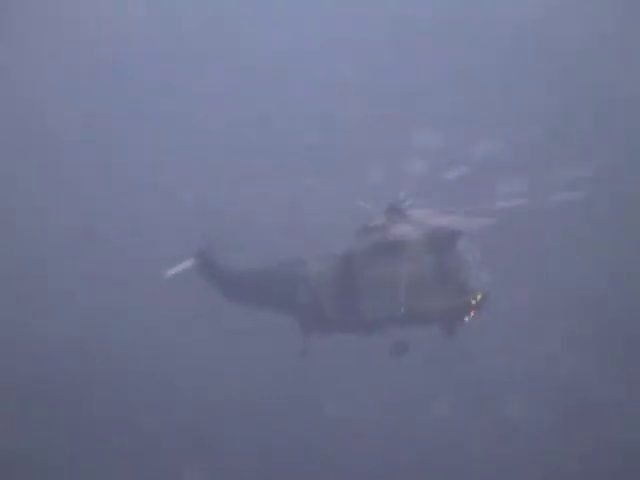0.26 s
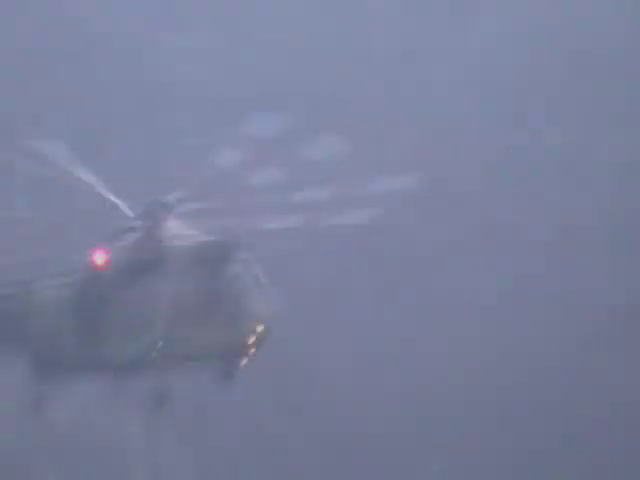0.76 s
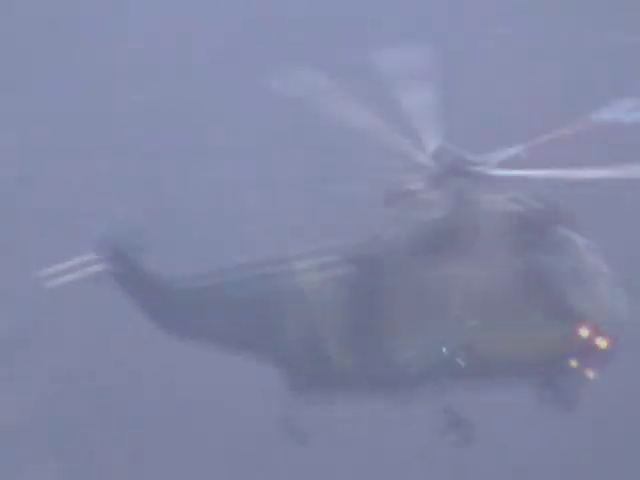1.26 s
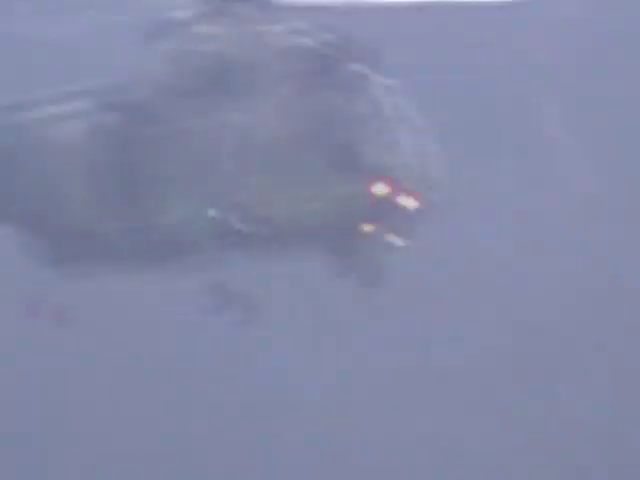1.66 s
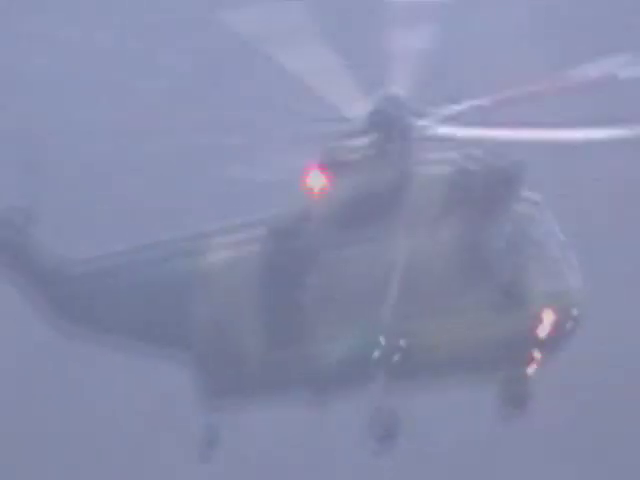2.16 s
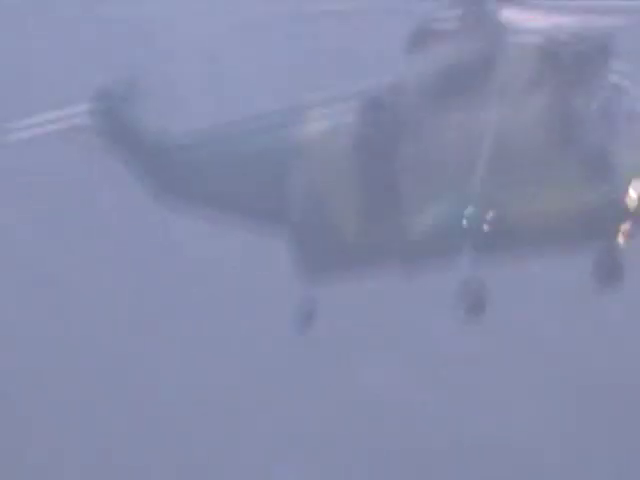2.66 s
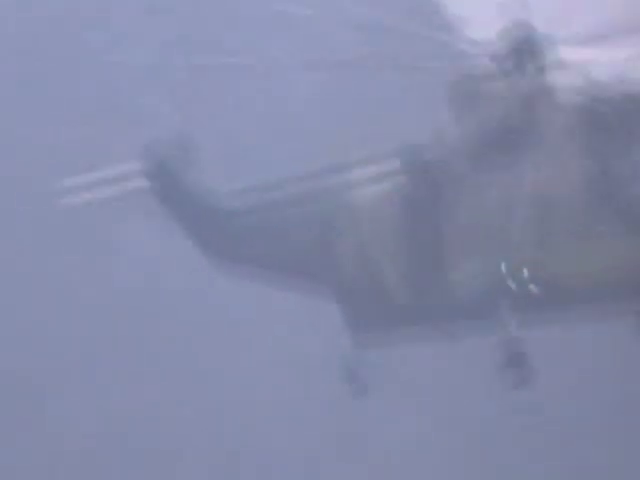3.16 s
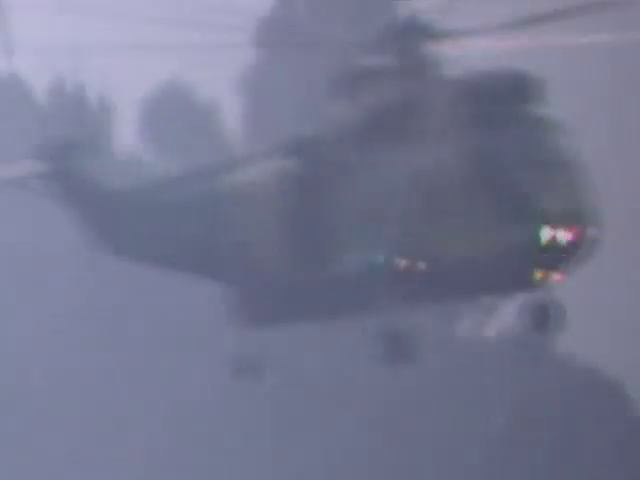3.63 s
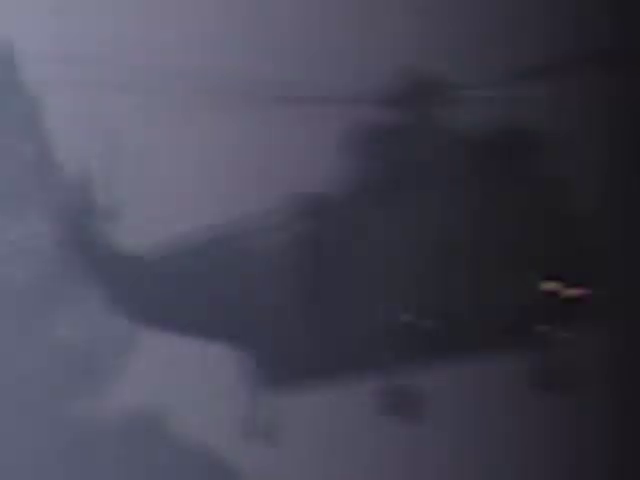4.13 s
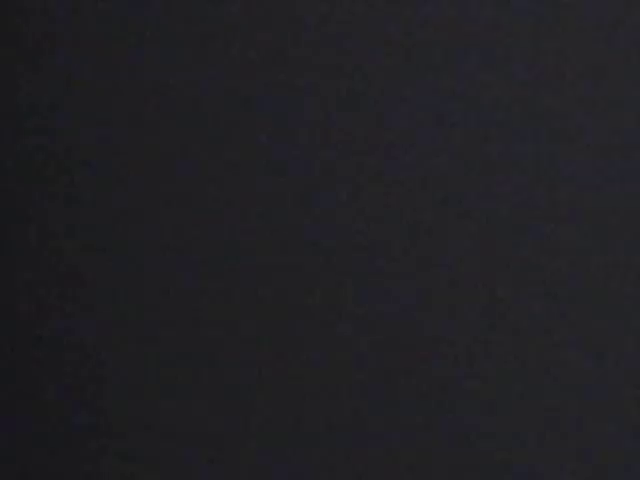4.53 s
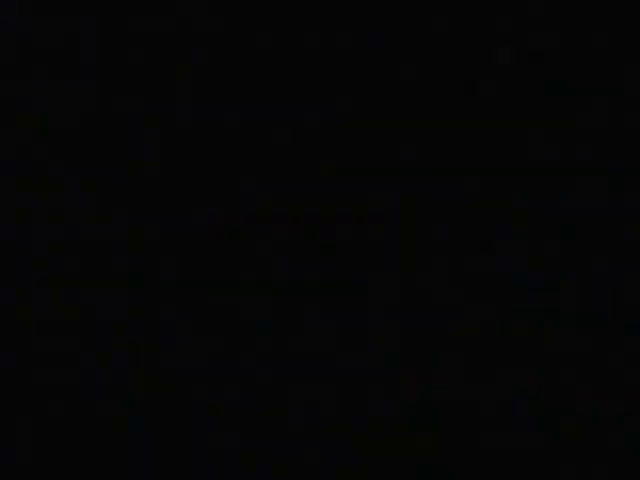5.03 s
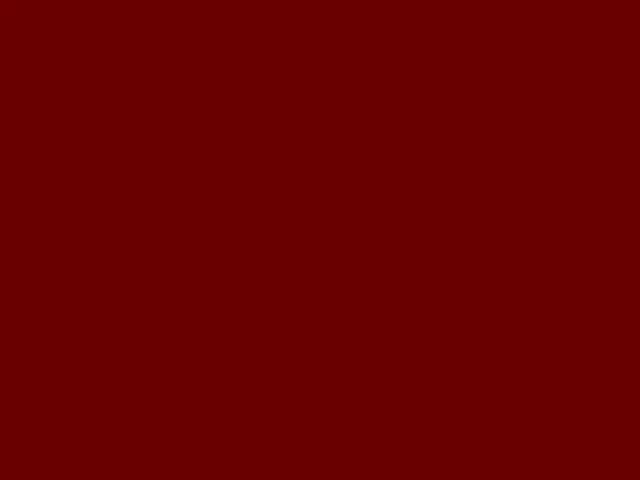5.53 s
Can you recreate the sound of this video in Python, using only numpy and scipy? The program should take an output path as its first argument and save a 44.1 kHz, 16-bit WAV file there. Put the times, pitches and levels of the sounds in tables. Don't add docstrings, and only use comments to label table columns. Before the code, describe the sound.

Outdoor helicopter flyby caught by a small stereo camera microphone. Fast, fluttering rotor pulses from several blade trains throb together, with midrange jet roar, faint gear whine and hiss cut into uneven ticks. Irregular cracking slaps come early, then again around the middle. One dry handling-like click is very close. From about three and a half seconds everything fades steadily, ending silent.

```python
import sys
import numpy as np
from scipy import signal
from scipy.fft import rfft, irfft, next_fast_len
from scipy.io import wavfile
from scipy.ndimage import uniform_filter1d

SR = 44100
rng = np.random.default_rng(int(sys.argv[2]) if len(sys.argv) > 2 else 0)


def waveform_to_disk(signal):
    frames = np.transpose(np.atleast_2d(signal))
    scaled = np.clip(frames, -1, 1) * 32767
    samples = np.round(scaled).astype(np.int16)
    wavfile.write(sys.argv[1], SR, samples)


def voltage_ratio(level):
    return 10 ** (np.asarray(level, float) / 20)


N = 255339
TIME = np.arange(N) / SR

# time_s, passes_hz
CHOP_RATE = [(0.0, 37.063), (0.45, 37.004), (0.9, 36.942), (1.35, 36.841), (1.8, 36.711), (2.25, 36.605),
             (2.7, 36.529), (3.15, 36.458), (3.6, 36.375), (4.05, 36.292), (4.5, 36.215), (4.95, 36.142),
             (5.4, 36.068)]
CHOP_START = .473
# start_s, peak_db, ring_hz
SLAP_EVENTS = [(0.615, -22.5, 1085), (0.6695, -17, 1266), (0.679, -20, 1320), (0.7279, -21, 1165),
               (0.747, -27.5, 1120), (0.818, -26.5, 1030), (0.84, -20.5, 1300), (0.856, -24.5, 1266),
               (0.911, -20, 1143), (0.964, -26, 1664), (1.836, -24.5, 910), (2.373, -33, 1137),
               (2.525, -28, 1310), (3.043, -34, 1163), (3.917, -25.5, 1280), (4.189, -28, 1180),
               (4.238, -33.5, 1180), (4.46, -35, 1180), (0.8938, -19.5, 1225), (0.9474, -19, 1200),
               (1.0198, -21.5, 1146), (1.136, -19.5, 1230), (1.281, -26.5, 1173), (1.3395, -19, 1110),
               (1.3897, -30, 1150), (1.4488, -19, 1240), (2.003, -26.5, 1216), (2.0622, -26, 1200),
               (2.3292, -25.5, 1280), (2.4977, -26.5, 1190), (2.992, -37.5, 1198), (3.1435, -32.5, 1230),
               (3.235, -22, 1180), (3.5917, -25.5, 1320), (3.694, -19, 1270), (3.7453, -22, 1260),
               (3.8063, -20, 1210), (3.9682, -20.5, 1140), (4.0235, -36, 1190), (.0992, -25, 1350),
               (.4274, -27.5, 1340), (.8764, -27, 1330), (1.1997, -26, 1210), (1.489, -27, 1250),
               (1.5628, -25, 1200), (2.2767, -30, 1280), (2.8325, -31, 1250), (3.3702, -37.5, 1320),
               (3.6471, -24, 1290), (4.1031, -29.5, 1290)]
# time_s, share_of_later_colour (0-1)
TURN_AWAY = [
    (0, 0.02),
    (.9, 0.12),
    (1.7, 0.6),
    (2.5, 0.82),
    (5.8, 0.99),
]
# pitch_hz, left_over_right_db, left_lead_rad, likeness (0-1)
MIC_PAIR = [(34.4, 6.8, -1.05, 0.97), (70, 1.5, -.87, 1), (130, -1, -0.55, 0.97), (300, -3.2, -0.2, 1),
            (1000, -2.2, .06, .98), (2480, -2.1, .08, .96), (4000, -4, 0, .97), (6300, -3.4, .07, .94),
            (7100, -1.5, .35, .7), (7900, 3.5, -2.2, .3), (8700, 2.2, -1.7, .8), (9600, 2, -1.2, .8),
            (10500, -1.5, -.9, .8), (12000, -.3, -.5, .15)]
BOUNCES = rng.uniform(.0003, .006, (2, 7))


def evened(x):
    return x / np.sqrt(np.mean(x ** 2) + 1e-20)


def read(points, hz, col=1):
    table = np.transpose(points)
    return np.interp(np.log(hz + 1), np.log(table[0] + 1), table[col])


def along(rows, col=1):
    table = np.transpose(rows)
    return np.interp(TIME, table[0], table[col])


def turned_away():
    return np.clip(along(TURN_AWAY), 0, 1)


def turns_of(rate, start):
    return np.cumsum(along(rate)) / SR + start


def wobble(hz):
    z = rfft(rng.standard_normal(N // 64 + 2))
    slow = irfft(z / (1 + (np.linspace(0, SR / 128, len(z)) / hz) ** 2))
    return np.interp(np.arange(N) / 64, np.arange(len(slow)), evened(slow - slow.mean()))


def ports(hz):
    # pitch_hz, level_db
    shell_echo = [(600, -14), (2000, -22), (5000, -22), (7000, -12), (8500, -5), (10000, -5), (14000, -5)]
    half = voltage_ratio(read(MIC_PAIR, hz) / 2) * np.exp(.5j * read(MIC_PAIR, hz, col=2))
    echoes = sum(np.exp(-2j * np.pi * np.outer(delay, hz)) for delay in BOUNCES.T)
    echoes = echoes / np.sqrt(BOUNCES.shape[1])
    share = voltage_ratio(read(shell_echo, hz))
    return np.array([half, 1 / half]) * (1 + share * echoes) / np.sqrt(1 + share ** 2)


def heard(x):
    size = next_fast_len(N + 4096)
    return irfft(rfft(x, size) * ports(np.fft.rfftfreq(size, 1 / SR)), size)[:, :N]


def noise(colour, patchy_db, size=1024, apart=0., bins=7, frames_long=12):
    hop = size // 4
    frames, hz = N // hop + 5, np.fft.rfftfreq(size, 1 / SR)
    a, b, c, d, patches = rng.standard_normal((frames, len(hz), 5)).T
    patches = uniform_filter1d(patches, size=round(bins), axis=0)
    patches = evened(uniform_filter1d(patches, size=round(frames_long), axis=1))
    same = np.clip(read(MIC_PAIR, hz, col=3) - apart, -1, 1)[:, None]
    left = a + 1j * b
    right = same * left + np.sqrt(1 - same ** 2) * (c + 1j * d)
    z = np.array([left, right]) * ports(hz)[:, :, None]
    z *= voltage_ratio(read(colour, hz)[:, None] + patchy_db * patches)
    return evened(signal.istft(z, nperseg=size, noverlap=size * 3 // 4)[1][:, :N])


def blades(orders, turns, unsteady_db, jitter, sweep=0.):
    k, db = np.transpose(orders)
    level = np.interp(np.arange(129), np.r_[0, k, k[-1] + 7], np.r_[-80, db, -80])
    log_gain = level * np.log(10) / 20
    phase = -signal.hilbert(np.r_[log_gain, log_gain[-2:0:-1]]).imag
    phase = phase - sweep * np.arange(256) ** 2
    turns = turns + jitter * wobble(5.4)
    wave = 0
    for m, order_db in orders:
        strength = voltage_ratio(order_db + unsteady_db * wobble(0.57))
        wave = wave + strength * np.cos(2 * np.pi * round(m) * turns + phase[round(m)])
    return np.sqrt(2) * wave * voltage_ratio(unsteady_db * wobble(32))


def rotors():
    # time_s, passes_hz
    loud_rate = [(0.0, 38.748), (0.45, 38.693), (0.9, 38.633), (1.35, 38.526), (1.8, 38.402),
                 (2.25, 38.306), (2.7, 38.233), (3.15, 38.152), (3.6, 38.062), (4.05, 37.973),
                 (4.5, 37.894), (4.95, 37.816), (5.4, 37.739)]
    slow_rate = [(0.0, 22.385), (0.45, 22.465), (0.9, 22.511), (1.35, 22.3), (1.8, 22.038), (2.25, 21.972),
                 (2.7, 22.034), (3.15, 22.073), (3.6, 22.078), (4.05, 22.014), (4.5, 21.983),
                 (4.95, 21.996), (5.4, 22.008)]
    # multiple, rms_db
    loud_orders = [(1, -48.5), (2, -55.5), (3, -37), (4, -51), (5, -49.5), (6, -45), (7, -41.5), (8, -36),
                   (9, -32.5), (10, -36), (11, -37.5), (12, -38.5), (13, -38.5), (14, -63.5), (15, -64),
                   (16, -54), (17, -55), (18, -60.5), (19, -62.5), (20, -69), (21, -86.5), (22, -65.5),
                   (23, -52.5), (24, -60), (25, -59.5), (26, -59)]
    chop_orders = [(1, -64), (2, -76.5), (3, -47), (4, -47.5), (5, -55), (6, -45.5), (7, -51.5), (8, -47.5),
                   (9, -40.5), (10, -43), (11, -44), (12, -44.5), (13, -48), (14, -50), (15, -52.5)]
    slow_orders = [(1, -69.5), (2, -57.5), (3, -42.5), (4, -36), (5, -42), (6, -38.5), (7, -37.5), (8, -60),
                   (9, -57.5), (10, -50.5), (11, -47.5), (12, -49), (13, -58)]
    loud = blades(loud_orders, turns_of(loud_rate, .255), unsteady_db=.5, jitter=.001, sweep=.028)
    chop = blades(chop_orders, turns_of(CHOP_RATE, CHOP_START), unsteady_db=.7, jitter=.002)
    slow = blades(slow_orders, turns_of(slow_rate, .732), unsteady_db=.6, jitter=.004)
    return voltage_ratio(-0.22) * heard(loud + chop + slow)


def slaps():
    thud_early, thud_late = .55, .12
    glide, glide_s = .13, .003
    out, t, late = np.zeros(N), np.arange(1300) / SR, turned_away()
    thud = -(np.sin(2 * np.pi * 800 * t) - .6 * np.sin(2 * np.pi * 1600 * t)) * voltage_ratio(-60 * t / 0.012)
    bent = t - glide * glide_s * (1 - np.exp(-t / glide_s))
    front = 1 - np.exp(-t / 0.00049)
    for s, db, hz in SLAP_EVENTS:
        share = thud_early + (thud_late - thud_early) * late[round((s - .3) * SR) if s > .3 else 0]
        ring = np.sin(2 * np.pi * 1.03 * hz * bent)
        ring += 0.2 * np.sin(2 * np.pi * 0.44 * hz * t) + 0.18 * np.sin(2 * np.pi * 1.38 * hz * t)
        slap = (share * thud + ring * voltage_ratio(-60 * t / 0.031)) * front
        out[round(s * SR):][:len(t)] += slap * voltage_ratio(db - 0.5)
    return heard(out)


def lulls():
    lull_s, lull_db = .009, -7
    half = lull_s / 2
    return lull_db * np.max([np.exp(-((TIME - s + half) / half) ** 2) for s, db, hz in SLAP_EVENTS], axis=0)


def roaring(facing_db, late):
    # pitch_hz, level_db
    side_colour = [(420, -41.5), (720, 4), (764, -1), (903, 5.5), (1000, -3.5), (1260, 7.5), (1440, -5),
                   (1600, 0), (1910, -9.5), (2150, -7), (2580, -14.5), (3000, -32.5), (3900, -51.5),
                   (6600, -120)]
    away_colour = [(420, -37.5), (720, -1.5), (893, -0.5), (1050, -0.5), (1250, 1.5), (1320, 2.5),
                   (1430, -6.5), (1690, 0.5), (1980, -9.5), (2130, -4), (2580, -25.5), (3000, -18),
                   (3900, -29), (6600, -120)]
    throb = np.cos(2 * np.pi * (18.2 * TIME + 0.68 + 0.095 * wobble(1.2))) ** 3
    side = noise(side_colour, patchy_db=0.77, bins=4, frames_long=14)
    away = noise(away_colour, patchy_db=0.77, bins=4, frames_long=14)
    roar = np.sqrt(1 - late) * side + np.sqrt(late) * away
    return roar * voltage_ratio(-33.5 + facing_db + 1.6 * throb + lulls() + 0.25 * wobble(40))


def droning(facing_db, late):
    # pitch_hz, level_db
    drone_colour = [(430, -25), (520, 9), (580, 8), (650, 7.5), (720, -13), (800, -49.5)]
    # centre_s, width_s, level_db
    surges = [
        (1.1, .1, 2.5),
        (3.3, .12, 4.5),
        (4.1, .5, 5.5),
    ]
    lead_s = 0.32 * (1 - late)
    led_db = np.interp(TIME + lead_s, TIME, facing_db)
    level_db = -37 + 2.1 * led_db + 1.0 * wobble(1.7)
    level_db = level_db + sum(db * np.exp(-((TIME - s) / width) ** 2) for s, width, db in surges)
    return voltage_ratio(level_db + .5 * lulls()) * noise(drone_colour, patchy_db=.8, bins=3, frames_long=20)


def rumbling(facing_db, late):
    # pitch_hz, level_db
    rumble_colour = [(30, -47), (60, -34.5), (100, -7.5), (125, 2), (150, -1.5), (185, 6), (210, -12),
                     (240, 0.5), (285, -10), (400, -11.5), (520, -11), (750, -17.5), (1100, -49.5)]
    level_db = -33.5 - 1 * (1 - late) - .2 * facing_db + .2 * wobble(4.4)
    return voltage_ratio(level_db) * noise(rumble_colour, patchy_db=.2, size=2048)


def rim():
    # pitch_hz, level_db
    rim_colour = [(1300, -27), (1650, 6.5), (1900, -4.5), (2200, -2.5), (2600, -8), (3100, -13),
                  (3800, -44)]
    sweep = np.exp(-((TIME - 1.45) / 0.27) ** 2)
    return voltage_ratio(-40) * sweep * noise(rim_colour, patchy_db=3.5, size=512)


def whining():
    # pitch_hz, rms_db
    whine_tones = [(1587, -57), (2101, -63), (3068, -66), (3569, -69), (3714, -67), (3890, -70),
                   (4134, -66), (4900, -68), (5206, -72), (5441, -72), (6035, -72), (6331, -71),
                   (7090, -75), (7295, -76), (8293, -79)]
    tones = 0
    for hz, db in whine_tones:
        level = voltage_ratio(db + 2.5 + 2.5 * wobble(5))
        tones = tones + level * np.cos(2 * np.pi * hz * TIME + .7 * wobble(4))
    return heard(tones)


def gear():
    # time_s, pitch_hz, rms_db
    gear_course = [(0, 930, -45), (.55, 927.5, -45), (.7, 927, -49), (1.1, 925, -47.5), (1.5, 922, -49),
                   (1.85, 918, -46.5), (2.3, 916, -52)]
    dying_db = 30 * np.maximum(TIME - 2.3, 0)
    level_db = along(gear_course, col=2) + 2 - dying_db + 2 * wobble(5)
    return heard(voltage_ratio(level_db) * np.cos(2 * np.pi * turns_of(gear_course, 0) + 0.08 * wobble(3)))


def turbine():
    # time_s, level_db
    facing = [(0, -3), (.3, -2.5), (.6, -1), (.95, 1), (1.2, -0.5), (1.55, -0.8), (1.9, -3), (2.3, -4.5),
              (2.7, -6), (3.15, -2.5), (3.35, -4), (3.65, -3.5), (4.1, -5), (4.8, -6.5), (5.3, -3.5)]
    facing_db, late = along(facing), turned_away()
    broad = roaring(facing_db, late) + droning(facing_db, late) + rumbling(facing_db, late)
    return broad + rim() + whining() + gear()


def knocks(turns, strength):
    # place_turns, level_db
    knock_places = [
        (0.099, 7),
        (.17, 4.5),
        (0.26, -2),
    ]
    # pitch_hz, level_db, t60_s
    metal_rings = [(8950, -9, .01), (9300, -7, .011), (9680, -4, .01), (9900, 0, .012), (10110, -1, .012)]
    t, train = np.arange(700) / SR, np.zeros(N)
    for turn, db in knock_places:
        train[1:] += voltage_ratio(db) * np.diff(np.floor(turns - turn)) * strength[1:]
    ring = sum(voltage_ratio(db - 60 * t / t60) * np.sin(2 * np.pi * hz * t) for hz, db, t60 in metal_rings)
    ring = ring * (1 - np.exp(-t / .0005))
    return evened(heard(signal.oaconvolve(train, ring)[:N]))


def exhaust():
    # pitch_hz, level_db
    hiss_colour = [(1290, -26.5), (2200, -0.5), (2830, -3), (3040, -3), (3230, -4), (4000, -4), (4500, -9),
                   (4980, -6), (5430, -8.5), (6820, -9), (8370, -11.5), (10000, -16), (11600, -48.5),
                   (14400, -47.5)]
    tick_colour = [(3000, -27), (4500, -11.5), (6500, -8), (8000, -17), (9500, -10), (10300, -21.5),
                   (11000, -28.5), (11800, -44), (14500, -49.5)]
    # place_turns, width_turns, level_db
    puffs = [
        (.16, 0.041, -3),
        (.27, 0.023, -1),
        (.4, 0.11, -3),
    ]
    weak = [.048, .156, .237, .399, .75, 1.13, 1.292, 1.319, 1.401, 1.482, 1.618, 1.754, 1.782, 1.836,
            1.863, 2.191, 2.218, 2.273, 2.601, 3.176, 3.533, 3.891, 4.028, 4.166, 4.332, 4.608, 4.718,
            4.801, 4.912, 4.995, 5.022, 5.105]
    missed = [0.452, 0.776, 0.884, 0.938, 0.993, 1.047, 1.237, 1.427, 1.59, 1.644, 1.699, 1.807, 1.998,
              2.435, 2.626, 2.763, 2.818, 2.9, 2.982, 3.284, 3.311, 3.503, 3.558, 3.723, 3.916, 4.136,
              4.302, 4.357, 4.384, 4.467, 2.054, 3.368, 3.423, 3.808, 4.221, 4.635, 4.663, 4.967]
    turns = turns_of(CHOP_RATE, CHOP_START)
    cycle = np.floor(turns + .3).astype(int)
    strength = voltage_ratio(.9 * rng.standard_normal(cycle[-1] + 1))
    strength[cycle[(np.array(weak) * SR).astype(int)]] *= voltage_ratio(-6)
    strength[cycle[(np.array(missed) * SR).astype(int)]] *= voltage_ratio(-22.5)
    each = strength[cycle]
    place = turns - cycle
    puff = np.sqrt(sum(voltage_ratio(2 * db) * np.exp(-((place - at) / width) ** 2) for at, width, db in puffs))
    swing_db = 1.3 * np.cos(2 * np.pi * (turns - .25)) + 0.62 * wobble(19)
    steady = noise(hiss_colour, patchy_db=1.5) * voltage_ratio(swing_db)
    ticks = noise(tick_colour, patchy_db=-2.0, size=256) * puff * each
    return voltage_ratio(-46.0) * (steady + ticks + voltage_ratio(-15.5) * knocks(turns, each))


def click():
    # start_s, peak_db, t60_s
    cracks_at = [
        (1.6668, -29, .011),
        (1.6706, -12, .01),
        (1.6726, -25, .016),
        (1.682, -36, .005),
    ]
    # pitch_hz, level_db
    click_colour = [(500, -22), (900, -8), (1700, 0), (2600, 1), (3300, -5), (4200, -4), (5800, -3),
                    (6600, -5), (7500, -15), (9600, -14), (12000, -29), (14500, -38)]
    # pitch_hz, level_db, t60_s
    shell_rings = [(1600, 0, .018), (2300, -1, .014), (5200, -6, .008)]
    shape = 0
    for s, db, t60 in cracks_at:
        begun = TIME >= s
        shape = shape + voltage_ratio(np.maximum(db - 60 * (TIME - s) / t60, -200) * begun) * begun
    cracks = np.maximum(np.diff(shape, prepend=0), 0) * np.array([[.9], [1.1]])
    t, detune = np.arange(900) / SR, np.array([[1.06], [.94]])
    ring = sum(voltage_ratio(db - 60 * t / t60) * np.sin(2 * np.pi * hz * t * detune) for hz, db, t60 in shell_rings)
    sharp = voltage_ratio(-2.5) * signal.oaconvolve(cracks, ring, axes=1)[:, :N]
    return voltage_ratio(-1.5) * shape * noise(click_colour, patchy_db=0, size=256, apart=0.22) + sharp


def scene():
    return rotors() + slaps() + turbine() + exhaust() + click()


def top_cut(x):
    return signal.sosfilt(signal.butter(12, 14740, fs=SR, output="sos"), x)


def record(dry):
    # pitch_hz, level_db
    treble_top = [(10250, 0), (11600, 1), (12100, -7), (12500, -5), (13700, -5), (14000, -8), (14350, -5),
                  (14550, -60)]
    fade_end_s, fade_s = 5.33, 1.857
    trace = voltage_ratio(-60) * (TIME < 5.345)
    limited = irfft(rfft(dry) * voltage_ratio(read(treble_top, np.fft.rfftfreq(N, 1 / SR))), N)
    faded = limited * np.clip((fade_end_s - TIME) / fade_s, trace, 1)
    return top_cut(faded)


dry = scene()
out = record(dry)
waveform_to_disk(out)
```